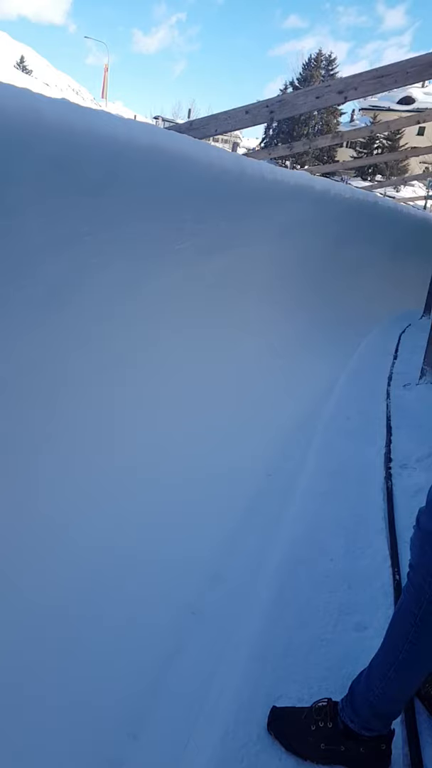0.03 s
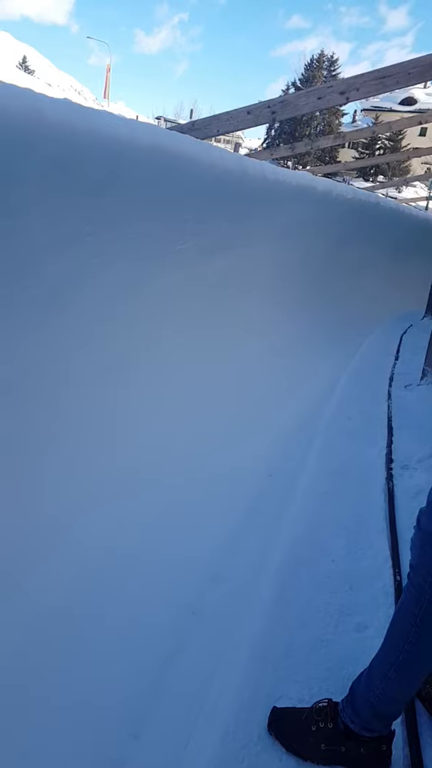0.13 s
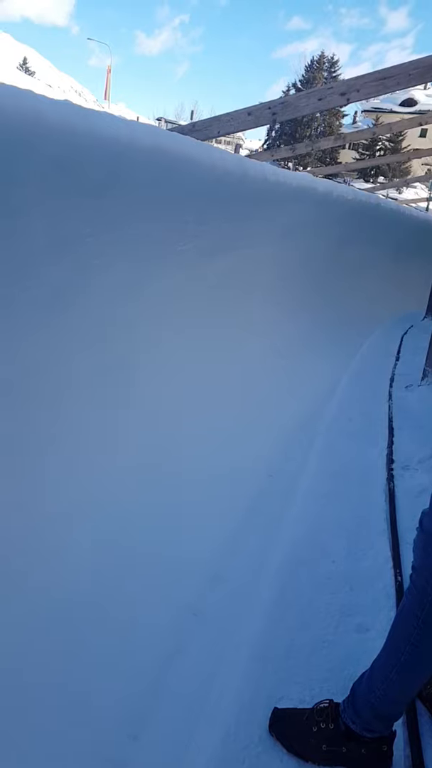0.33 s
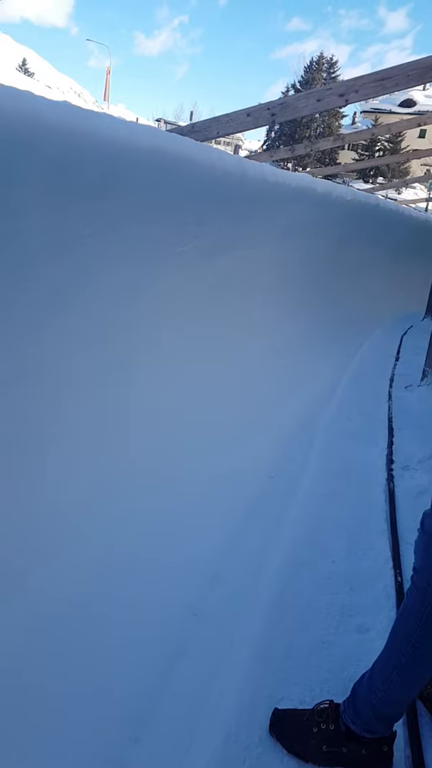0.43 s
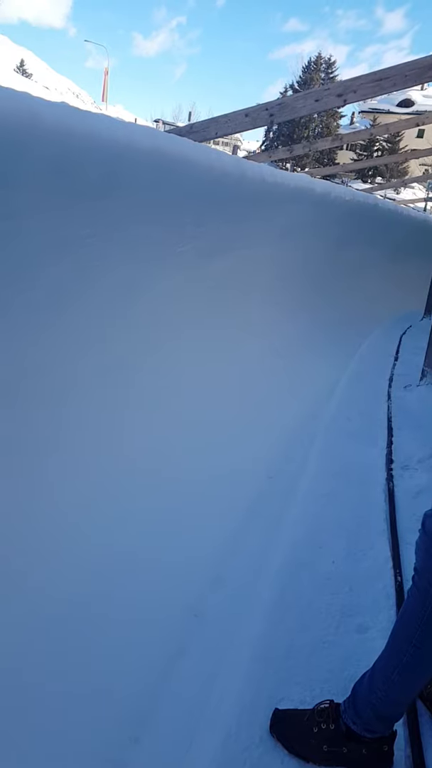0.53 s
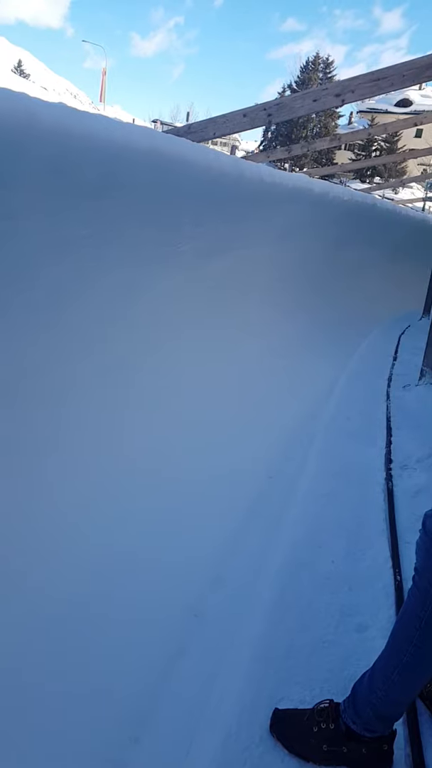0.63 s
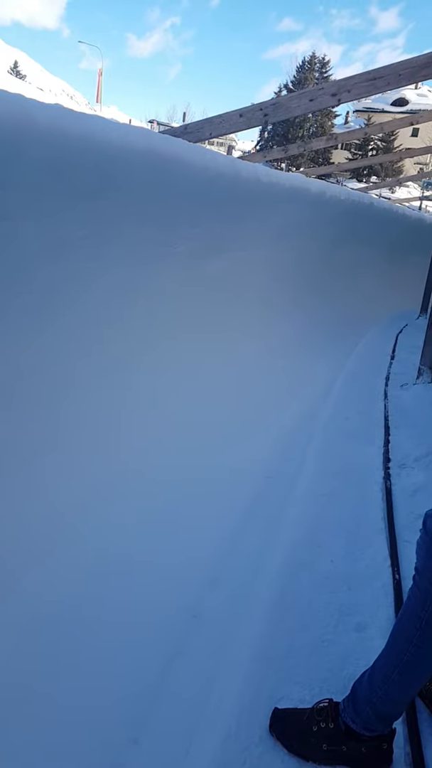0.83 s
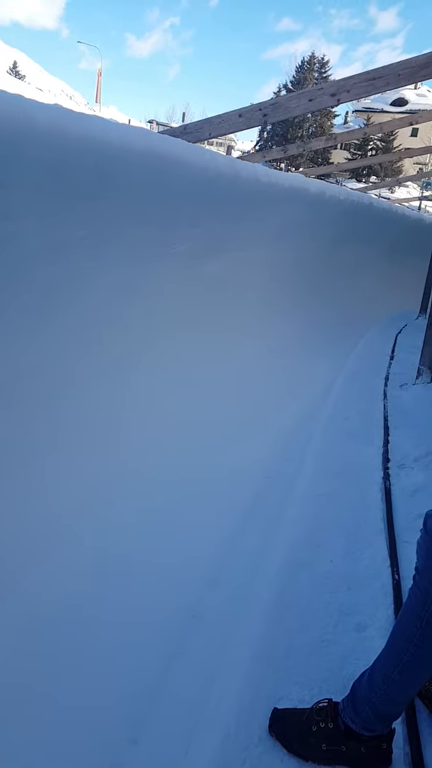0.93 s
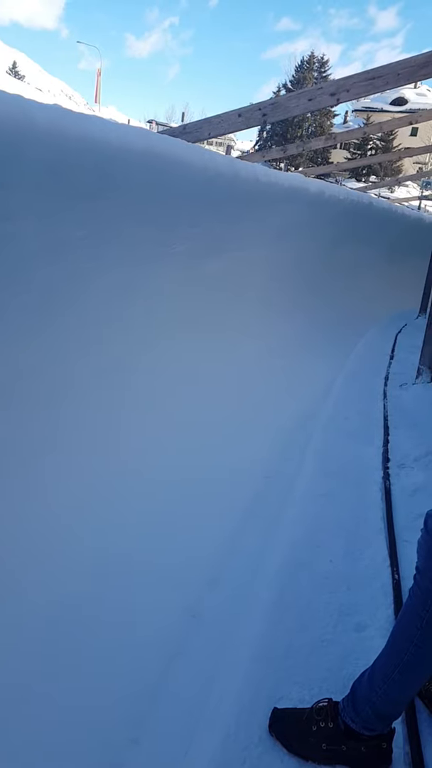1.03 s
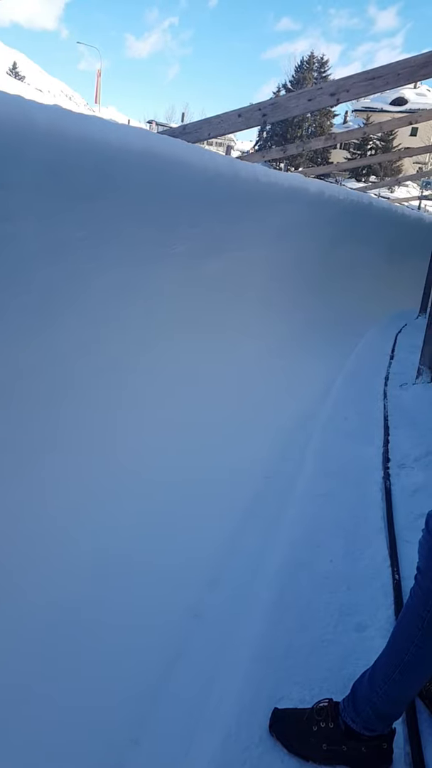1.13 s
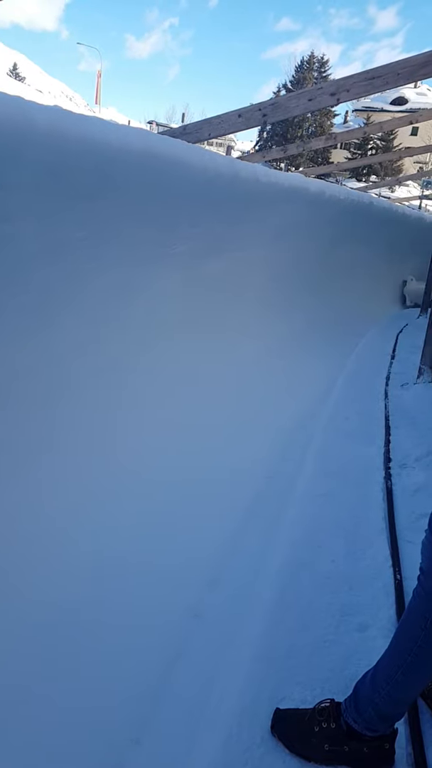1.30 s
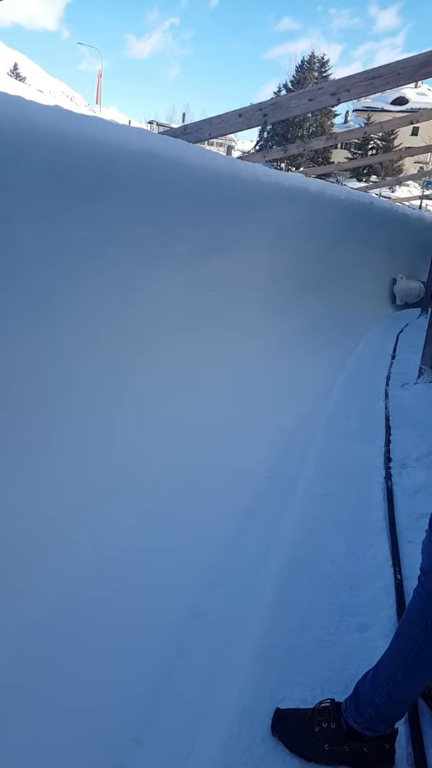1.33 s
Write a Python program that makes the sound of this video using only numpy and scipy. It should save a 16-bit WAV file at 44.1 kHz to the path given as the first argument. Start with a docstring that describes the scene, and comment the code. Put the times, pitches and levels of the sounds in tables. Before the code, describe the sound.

A sled runs down an iced channel outdoors, close to a small stereo microphone: low hollow drumming with hard thumps, patchy scraping and cracks, rattling fittings, a late growl, then an abrupt cut to faint deep rumble.

```python
"""A sled races down an iced channel outdoors, coming closer to a small two-port microphone.
Random bumps drum the hollow track through its resonances, and hard landings add decaying low tones.
The runners scrape as patchy noise with cracks at joints in the ice; fittings tick as short ringing noise.
Spray is high hiss, and the hull growls and sings as noise in narrow resonances that grow, then hold.
The sled cuts in from silence, and cuts out to a faint, very deep rumble of filtered noise."""
import sys
import numpy as np
from scipy import signal
from scipy.fft import rfft, irfft, next_fast_len
from scipy.io import wavfile
from scipy.ndimage import uniform_filter1d

SR = 44100
rng = np.random.default_rng(int(sys.argv[2]) if len(sys.argv) > 2 else 0)


def transcribe(signal):
    """Save signal, clipped to [-1, 1], as a 16-bit WAV file at the path in sys.argv[1]."""
    frames = np.atleast_2d(signal).T
    limited = np.clip(frames, -1, 1)
    pcm = np.round(limited * 32767).astype(np.int16)
    wavfile.write(sys.argv[1], SR, pcm)


def invert_db(level):
    """Linear amplitude ratio for a level in decibels (20 dB per decade), elementwise."""
    return 10 ** (np.asarray(level, dtype=float) / 20)


N = 85995


def evened(x):
    """Scales a sound to an rms of 1, all channels together."""
    return x / np.sqrt(np.mean(x ** 2) + 1e-20)


def read(points, hz):
    """Reads a spectrum table on a logarithmic frequency axis."""
    f, value = np.transpose(points)
    return np.interp(np.log(hz + 1), np.log(f + 1), value)


def curve(table, t, axis=1):
    """Draws straight lines through one column of a table against its times."""
    rows = np.array(table)
    return np.interp(t, rows[:, 0], rows[:, axis])


def filtered(x, gain):
    """Applies a complex gain given as a function of Hz."""
    size = next_fast_len(2 * N)
    spectrum = rfft(x, size) * gain(np.fft.rfftfreq(size, 1 / SR))
    return irfft(spectrum, size)[..., :N]


def resonate(x, hz, width):
    """A resonance of gain 1: shifts hz down to zero, smooths, and shifts back up."""
    turn = np.exp(2j * np.pi * hz * np.arange(len(x)) / SR)
    r = np.exp(-np.pi * width / SR)
    return 2 * (turn * signal.lfilter([1 - r], [1, -r], x / turn)).real


def strike(times, db, sound):
    """Places one sound at each time and level."""
    train = np.zeros(N)
    train[np.round(np.asarray(times) * SR).astype(int)] = invert_db(np.asarray(db))
    return signal.oaconvolve(train, sound)[:N]


def deep_rumble():
    """Faint, slow noise, most alike in both ports near 70 Hz and little alike higher up."""
    # Colour of the rumble. Each row: frequency in Hz, relative level in dB per Hz.
    rumble_colour = [(8, -14), (18, 2), (26, -9.5), (33, -0.5), (42, -11), (70, -19), (130, -31.5),
                     (185, -25), (270, -43.5), (450, -35), (700, -50.5), (1200, -56), (2400, -58.5),
                     (2900, -85), (16000, -95)]
    # Loudness of the rumble. Each row: time in seconds, level in dB.
    rumble_level = [(1.68, -47.5), (1.752, -34.5), (1.77, -43), (1.812, -36.5), (1.945, -40)]
    # How alike the ports sound. Each row: frequency in Hz, likeness 0-1.
    likeness = [(30, 0.85), (70, 1), (130, 0.71), (400, 0.17), (1000, .05)]
    a, b = rng.standard_normal((2, N))
    same = lambda hz: np.clip(read(likeness, hz), 0, 1)
    right = filtered(a, same) + filtered(b, lambda hz: np.sqrt(1 - same(hz) ** 2))
    rumble = filtered(np.array([a, right]), lambda hz: invert_db(read(rumble_colour, hz)))
    return evened(rumble) * invert_db(curve(rumble_level, np.arange(N) / SR))


def hull():
    """Close by, the hull growls and the runners sing: noise in a few resonances, each growing until it holds."""
    # Each row: frequency in Hz, width of the first of two filters in Hz, full level in dB, time it is full in s.
    resonances = [(469, 39, -36, 1.63), (540.6, 35, -41, 1.6), (639, 36, -43, 1.48),
                  (3360, 230, -48.5, 1.52)]
    growth_db_per_s, throb_db = 123, 2.5  # the throb is an rms swing
    t = np.arange(N) / SR
    noise = rng.standard_normal((len(resonances), 3, N))
    out = np.zeros((2, N))
    for (hz, width, db, full_s), (a, b, c) in zip(resonances, noise):
        slow = uniform_filter1d(uniform_filter1d(c, 500), 500)
        throb = throb_db * evened(slow)
        ring = evened(np.array([resonate(resonate(x, hz, width), hz, 2 * width) for x in (a, b)]))
        out += ring * invert_db(db + throb - growth_db_per_s * np.maximum(full_s - t, 0))
    return out


def spray():
    """Soft high hiss of thrown ice dust, heard more as the sled nears."""
    # Colour of the hiss. Each row: frequency in Hz, relative level in dB per Hz.
    spray_colour = [(5180, -29), (8800, -7), (9330, -6), (10600, 2.5), (12200, 1.5), (14500, -6),
                    (15800, -14.5)]
    # Loudness of the hiss. Each row: time in seconds, level in dB.
    spray_level = [(0.09, -89), (0.198, -80.5), (0.594, -68.5), (0.83, -71.5), (0.97, -61.5), (1.0, -67.5),
                   (1.278, -65.5), (1.58, -58), (1.665, -54)]
    hiss = filtered(rng.standard_normal((2, N)), lambda hz: invert_db(read(spray_colour, hz)))
    return evened(hiss) * invert_db(curve(spray_level, np.arange(N) / SR))


def ticks():
    """Loose fittings tick: each is a short rattle of noise ringing in one broad metal resonance."""
    # Each row: start in seconds, level in dB before the trim, resonance in Hz.
    fittings = [(0.1027, -73, 3300), (0.1396, -37.5, 4180), (0.184, -37, 4230), (0.223, -39.5, 4680),
                (0.3112, -30, 3370), (0.404, -35, 4620), (0.4586, -33.5, 4200), (0.6, -38, 4300),
                (0.639, -36, 3540), (0.6809, -31, 3380), (0.839, -57, 3350), (0.9485, -31, 3310),
                (1.1194, -29.5, 3290), (1.2374, -52, 3480), (1.3745, -31.5, 4740), (1.5219, -36, 3460),
                (1.5743, -26.5, 3300), (0.3214, -31.5, 1530), (0.4594, -27.5, 1280), (0.5272, -27, 1980),
                (0.9462, -34, 1830), (0.9734, -35, 1297), (1.038, -24, 1718), (1.2246, -30, 1500),
                (1.3934, -34.5, 2090), (0.9023, -34, 5030), (0.9477, -38, 5900), (1.2376, -43, 6430)]
    rise_s, t60_s, trim_db, width_hz = 0.0013, 0.036, -1, 460
    u = np.arange(3000) / SR
    out = np.zeros((2, N))
    shape = (1 - np.exp(-u / rise_s)) * invert_db(-60 * u / t60_s)
    noise = rng.standard_normal((len(fittings), 2, len(u)))
    for (s, db, hz), pair in zip(fittings, noise):
        for k in (0, 1):
            ring = evened(resonate(resonate(pair[k], hz, width_hz), hz, 3 * width_hz))
            out[k] += strike([s], [db + trim_db], ring * shape)
    return out


def scrape():
    """Two unrelated streams of patchy steel-on-ice hiss that chatter and crack together."""
    # Steady scrape of the runners. Each row: time in seconds, level in dB.
    runner_level = [(.09, -39), (.2, -40), (.29, -40.5), (.4, -38.5), (.58, -39), (.74, -43), (.86, -42.5),
                    (1.0, -40), (1.2, -40.5), (1.35, -45), (1.45, -41), (1.55, -39.5), (1.67, -36.5)]
    # Blend of the two colours. Each row: time in seconds, share of the brighter colour 0-1.
    colour_blend = [(.09, 0.05), (.5, 0.11), (.9, 0.51), (1.3, 0.36), (1.5, 0.57), (1.67, 0.31)]
    # Darker and brighter colours of the scrape. Each row: frequency in Hz, relative level in dB per Hz.
    darker_colour = [(300, -27.5), (440, -13.5), (480, -1.5), (640, -6.5), (900, -8), (2000, -14.5),
                     (2650, -23.5), (3300, -20), (4800, -23), (5700, -29), (7800, -39), (9000, -50),
                     (12000, -62), (15800, -86.5)]
    brighter_colour = [(300, -26), (440, -19.5), (480, -15.5), (640, -6), (1100, -19), (2100, -18.5),
                       (2650, -20.5), (3300, -19), (5000, -23), (5700, -29.5), (7800, -26), (9300, -41.5),
                       (11500, -49.5), (15800, -64)]
    # The runners cross joints in the ice. Each row: start in seconds, crack level in dB before the trim.
    joints = [(0.1005, -28), (0.2227, -43.5), (0.3105, -23), (0.3394, -35), (0.3994, -29.5), (0.459, -27),
              (0.5268, -23.5), (0.5778, -30), (0.6215, -37), (0.6714, -44.5), (0.8379, -41.5),
              (0.876, -31.5), (0.902, -27.5), (0.9462, -35), (0.9714, -37), (0.9824, -47.5), (0.9941, -47),
              (1.036, -31.5), (1.0634, -29), (1.1134, -32), (1.1807, -37.5), (1.2266, -32), (1.2996, -32),
              (1.3214, -39), (1.3922, -31), (1.46, -33.5), (1.493, -29), (1.5198, -28.5), (1.5529, -29),
              (1.5782, -27), (1.6247, -34)]
    patch_db, chatter_db, chatter_hz = 2.05, 1.5, 60  # both dB values are rms swings
    crack_t60_s, wash_t60_s, wash_db = 0.039, 0.24, -7.5  # a dry crack and a longer, softer wash
    burst_rise_s, burst_trim_db = 0.0033, -3.5
    frames, hz, t = N // 256 + 5, np.fft.rfftfreq(1024, 1 / SR), np.arange(N) / SR

    # patches: noise smoothed over frequency and time colours both streams alike
    z = rng.standard_normal((frames, 513, 5)).T
    patches = evened(uniform_filter1d(uniform_filter1d(z[4], 14, 0), 6, 1))
    bright = np.clip(curve(colour_blend, np.arange(frames) * 256 / SR), 0, 1)
    db = (1 - bright) * read(darker_colour, hz)[:, None] + bright * read(brighter_colour, hz)[:, None]
    gain = invert_db(db + patch_db * patches) / np.sqrt(np.mean(invert_db(db) ** 2, 0))
    spectra = (z[:2] + 1j * z[2:4]) * gain
    hiss = evened(signal.istft(spectra, nperseg=1024, noverlap=768)[1][:, :N])

    slow = lambda f: 1 / (1 + (f / chatter_hz) ** 2) * (f > 4)
    chatter = evened(filtered(rng.standard_normal(N), slow))
    steady = invert_db(curve(runner_level, t) + chatter_db * chatter)

    s, crack_db = np.transpose(joints)
    u = t[:12000]
    decay = invert_db(-60 * u / crack_t60_s) + invert_db(wash_db - 60 * u / wash_t60_s)
    burst = (1 - np.exp(-u / burst_rise_s)) * decay
    cracks = strike(s, crack_db + burst_trim_db, burst)
    return hiss * np.hypot(steady, cracks)


def drumming():
    """Random bumps under the runners shake the hollow track; hard landings add thumps."""
    # How hard the sled bears on the track.
    # Each row: time in seconds, drumming level in dB, level of the deep part relative to that in dB.
    bearing = [(0.09, -21.5, -17), (0.154, -23, -30.5), (0.194, -26.5, -11), (0.252, -19.5, -22),
               (0.3, -27, -19.5), (0.316, -20, -18), (0.488, -22.5, -7.5), (0.632, -19.5, -7.5),
               (0.752, -29, -1), (0.852, -22, -10.5), (0.988, -22, -3), (1.408, -25, -5), (1.496, -21, -15),
               (1.522, -29, 8.5), (1.55, -21.5, -11), (1.665, -27.5, 3.5)]
    # Body of the channel. Each row: frequency in Hz, relative level in dB per Hz.
    track_body = [(13, -61), (22, -45.5), (40, -33), (66, -7.5), (97, -6), (135, -3.5), (178, 1.5),
                  (225, 0.5), (425, -21.5), (468, -21.5), (600, -25.5), (780, -69.5), (1320, -120)]
    # Ringing of the channel. Each row: frequency in Hz, width of the first of two filters in Hz, relative dB.
    track_modes = [(149.8, 12, -14), (175.1, 6.7, 1), (202.3, 11, -8), (229, 22.8, -14.5)]
    # The sled's weight lands hard. Each row: start in seconds, envelope peak in dB before the trim, pitch in Hz.
    landings = [(0.104, -16, 168), (0.241, -11, 174.2), (0.315, -8, 179.6), (0.338, -17, 173),
                (0.419, -9.5, 208.2), (0.545, -8, 132), (0.575, -16, 121), (0.639, -6.5, 168.4),
                (0.709, -15.5, 148), (0.872, -13, 175.6), (0.945, -6.5, 194), (0.98, -15.5, 206.6),
                (1.042, -12, 177), (1.108, -16.5, 173.6), (1.224, -14, 190), (1.36, -13, 184.7),
                (1.44, -20.5, 183), (1.48, -17, 222.5), (1.544, -15.5, 173), (1.577, -11.5, 178),
                (1.618, -25, 125.6), (1.646, -9.5, 184.2)]
    bumps_per_s, bump_spread_db, modes_db, split_hz = 450, 2, -3, 117
    thump_trim_db, thump_rise_s, thump_t60_s = -3, 0.0038, 0.05
    t = np.arange(N) / SR

    heights = invert_db(bump_spread_db * np.minimum(rng.exponential(1, N), 4))
    bumps = heights * rng.choice([-1., 1.], N)
    bumps = bumps * (rng.random(N) < bumps_per_s / SR)

    upper = lambda hz: 1 / (1 + (split_hz / (hz + 1)) ** 8)
    deep = evened(filtered(bumps, lambda hz: invert_db(read(track_body, hz)) * (1 - upper(hz))))
    body = evened(filtered(bumps, lambda hz: invert_db(read(track_body, hz)) * upper(hz)))
    ring = evened(sum(invert_db(db) * resonate(resonate(bumps, hz, w), hz, 2 * w) for hz, w, db in track_modes))
    drum = evened(body + invert_db(modes_db) * ring)
    out = (drum + deep * invert_db(curve(bearing, t, axis=2))) * invert_db(curve(bearing, t))

    u = t[:5000]
    shape = (1 - np.exp(-u / thump_rise_s)) ** 2 * invert_db(-60 * u / thump_t60_s)
    shape = shape / shape.max()
    for s, db, hz in landings:
        out += strike([s], [db + thump_trim_db], shape * np.sin(2 * np.pi * hz * u))
    return out


def ports(a, b):
    """The right port hears part of the left's sound, shifted in phase, and the rest from elsewhere."""
    # Sound common to both ports. Each row: frequency in Hz, shared part 0-1.
    shared_part = [(60, .9995), (250, .995), (600, .92), (1400, .79), (3000, .6), (6000, .48), (11000, .28)]
    # Phase between the ports. Each row: frequency in Hz, lead of the left in radians.
    left_lead = [(0, 0), (780, 1.1), (1810, 0.8), (2580, 2.8), (3360, 1.9), (4050, 2.6), (4820, 4.6),
                 (5430, 4.3), (6980, 6.3), (8100, 6.2), (13300, 9.9), (15100, 16.8), (15400, 12.5),
                 (15900, 12.5)]
    # Balance of the ports. Each row: frequency in Hz, left minus right in dB.
    balance = [(60, -0.5), (92, 1.5), (140, 0), (210, -1), (330, -2.5), (500, -5.5), (770, -0.5), (1170, 4),
               (1790, -1.5), (2740, 5), (4190, -4.5), (6410, -0.5), (9810, 1), (15000, -3.5)]
    same = lambda hz: np.clip(read(shared_part, hz), 0, 1)
    half_tilt = lambda hz: invert_db(read(balance, hz) / 2)
    lag = lambda hz: np.exp(-1j * np.interp(hz, *np.transpose(left_lead)))
    left = filtered(a, half_tilt)
    common = filtered(a, lambda hz: same(hz) * lag(hz) / half_tilt(hz))
    elsewhere = filtered(b, lambda hz: np.sqrt(1 - same(hz) ** 2) / half_tilt(hz))
    return np.array([left, common + elsewhere])


def scene():
    """Sums the sled's sounds at the two ports, cuts them in and out, and leaves the rumble."""
    cut_in_s, cut_out_s, fade_in_s, fade_out_s = .0858, 1.6698, .003, .0001
    t = np.arange(N) / SR
    high = scrape() + ticks() + spray() + hull()
    sled = ports(drumming() + high[0], drumming() + high[1])
    starts = np.clip((t - cut_in_s) / fade_in_s, 0, 1)
    stays = np.clip((cut_out_s - t) / fade_out_s, 0, 1)
    return sled * starts * stays + deep_rumble() * (1 - stays)


def low_pass(x):
    """Removes everything above the highest recorded frequency."""
    return signal.sosfilt(signal.butter(12, 16370, fs=SR, output="sos"), x)


def record(dry):
    """Limits the treble with a steep linear-phase low-pass and finishes the mix."""
    top_hz = 15900
    lowpass = signal.firwin(255, top_hz, window=("kaiser", 9), fs=SR)
    limited = signal.oaconvolve(dry, lowpass[None], "same")
    return low_pass(limited)


dry = scene()
out = record(dry)
transcribe(out)
```